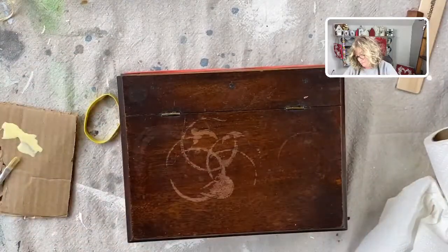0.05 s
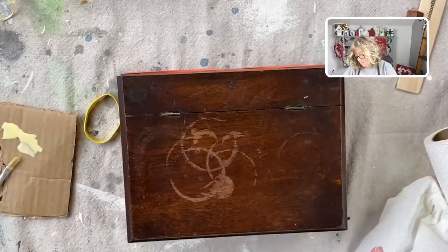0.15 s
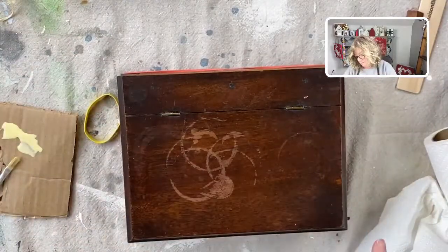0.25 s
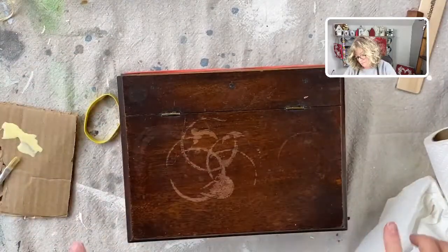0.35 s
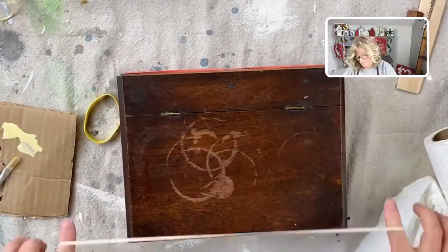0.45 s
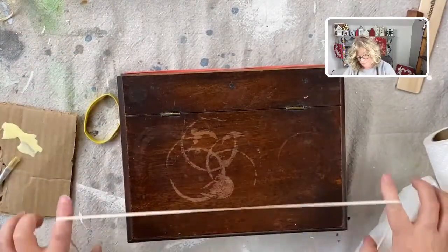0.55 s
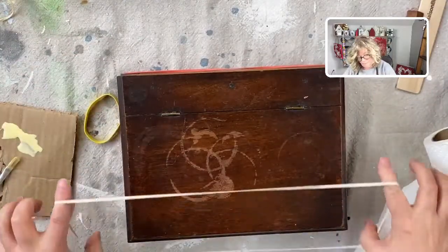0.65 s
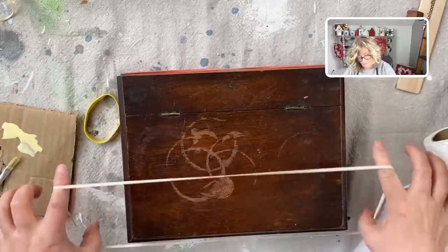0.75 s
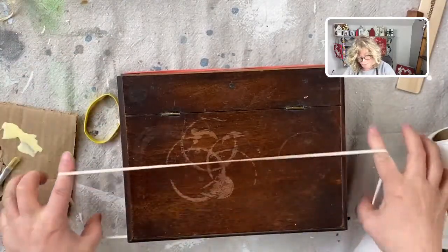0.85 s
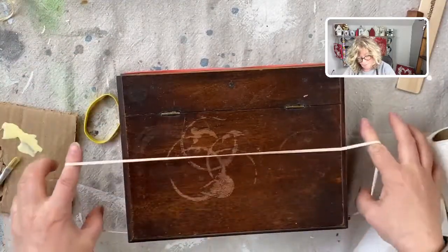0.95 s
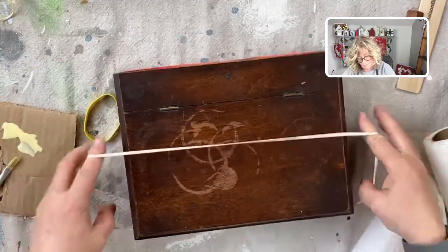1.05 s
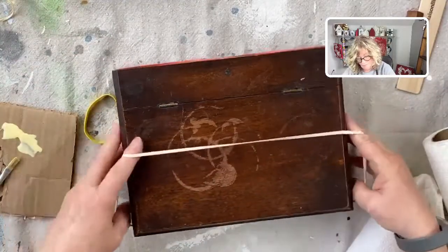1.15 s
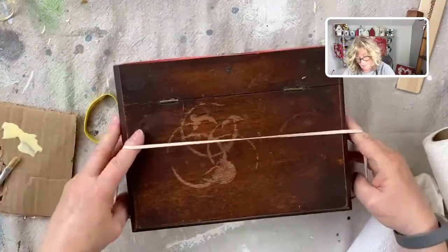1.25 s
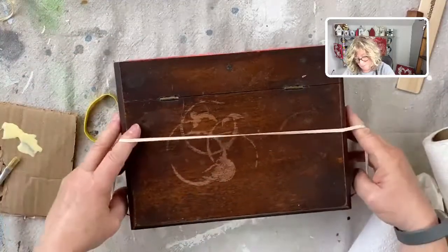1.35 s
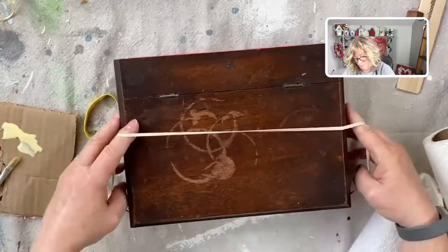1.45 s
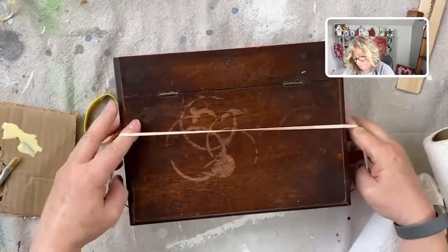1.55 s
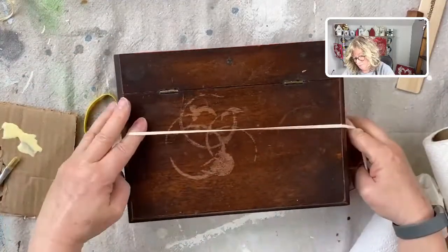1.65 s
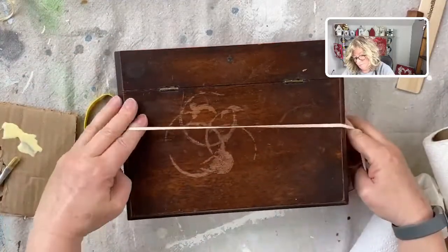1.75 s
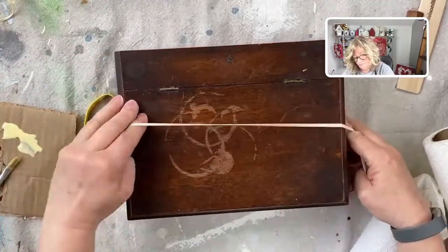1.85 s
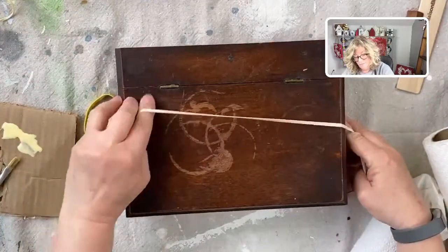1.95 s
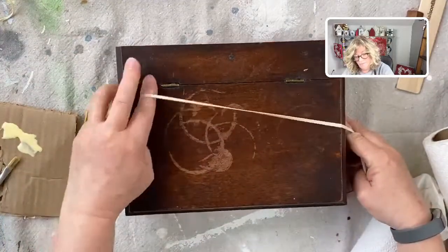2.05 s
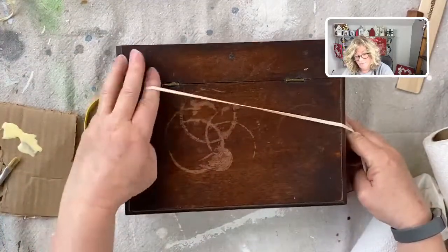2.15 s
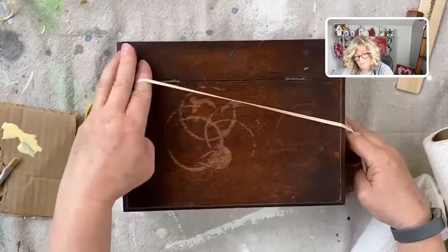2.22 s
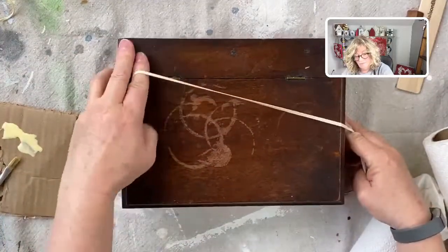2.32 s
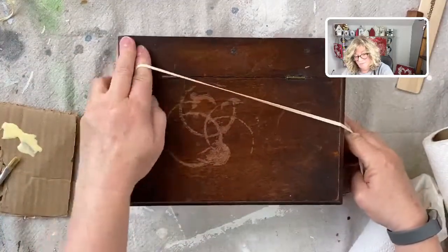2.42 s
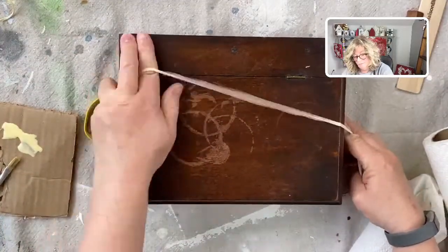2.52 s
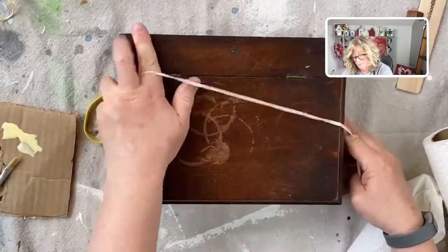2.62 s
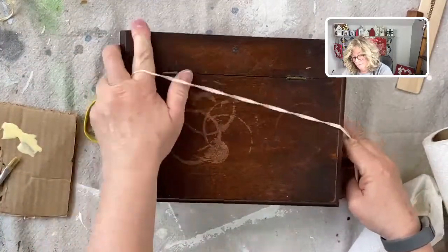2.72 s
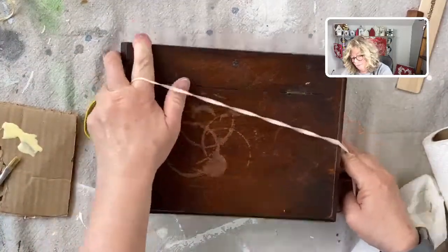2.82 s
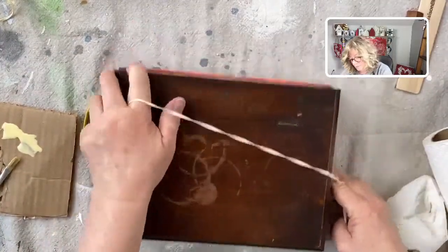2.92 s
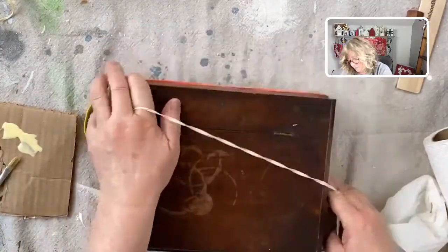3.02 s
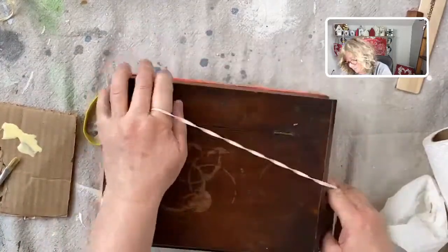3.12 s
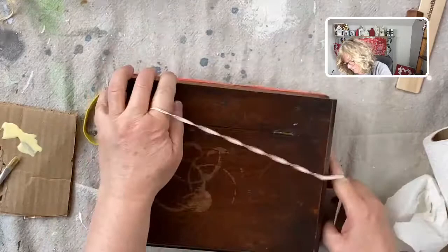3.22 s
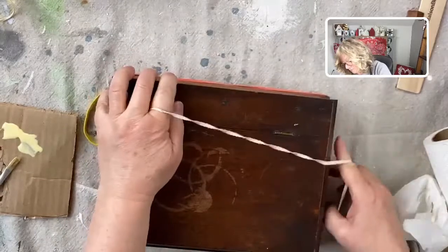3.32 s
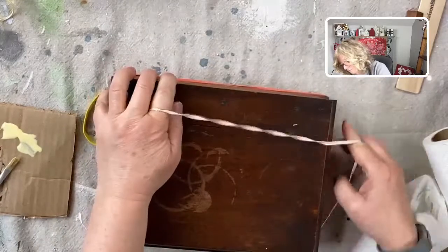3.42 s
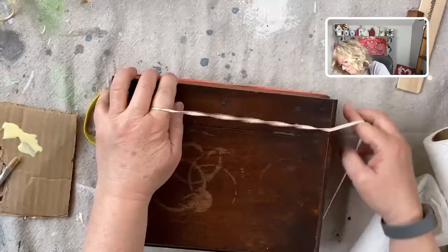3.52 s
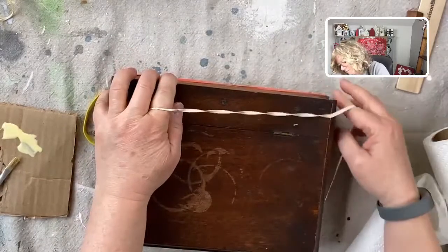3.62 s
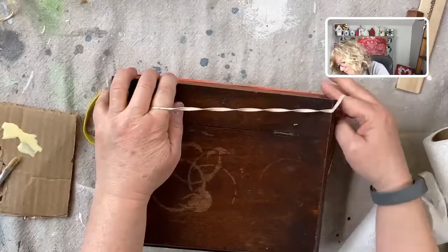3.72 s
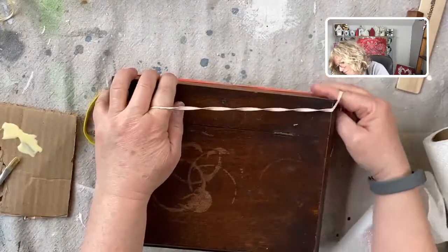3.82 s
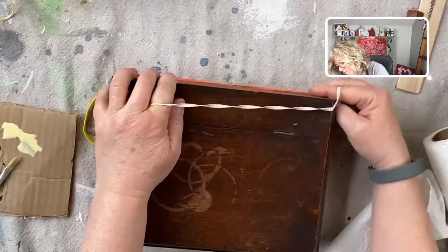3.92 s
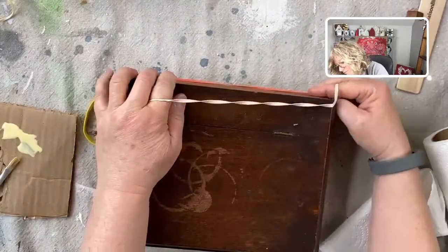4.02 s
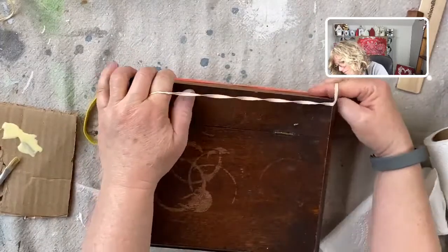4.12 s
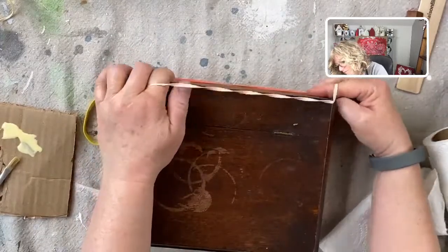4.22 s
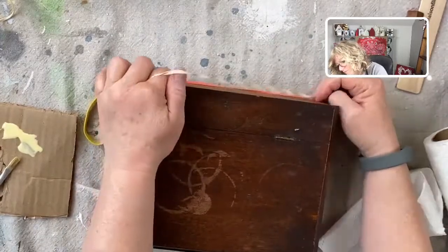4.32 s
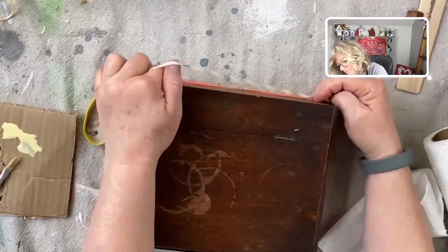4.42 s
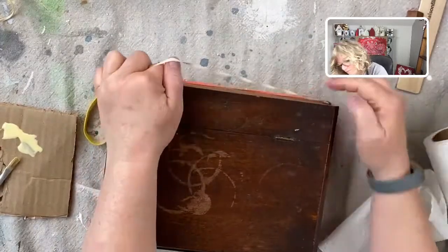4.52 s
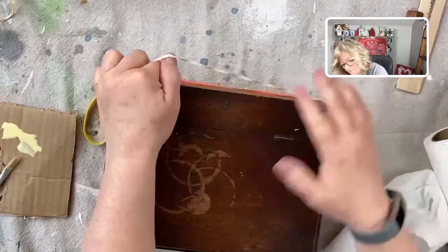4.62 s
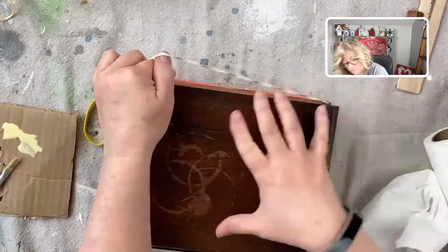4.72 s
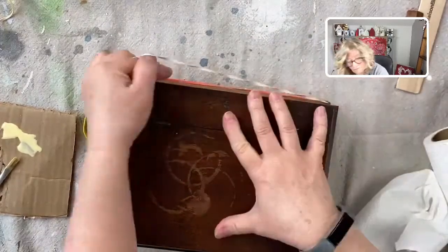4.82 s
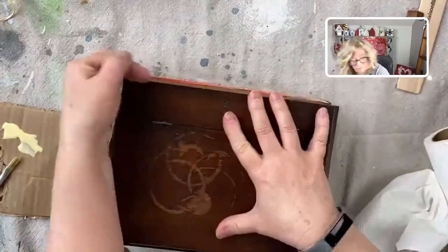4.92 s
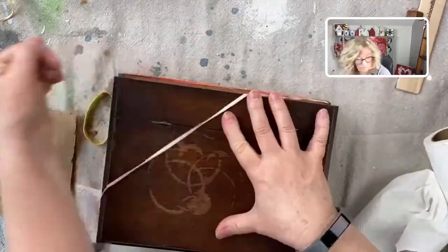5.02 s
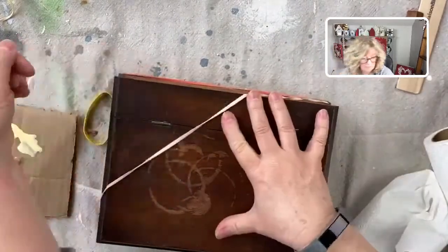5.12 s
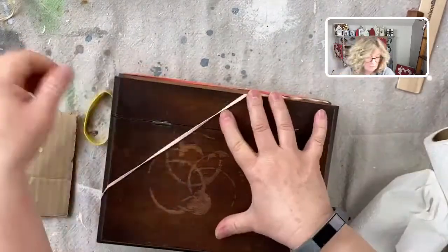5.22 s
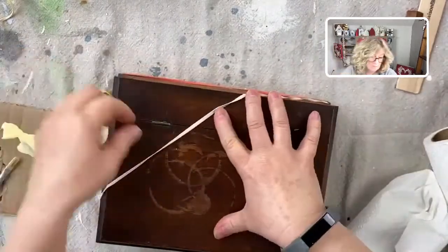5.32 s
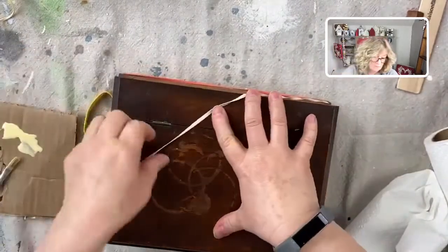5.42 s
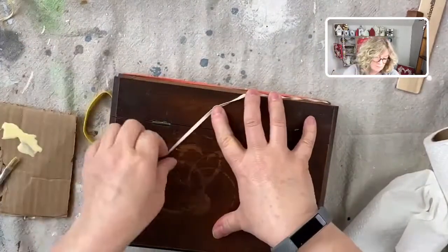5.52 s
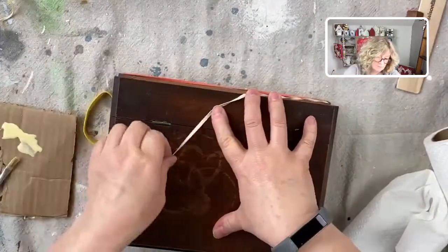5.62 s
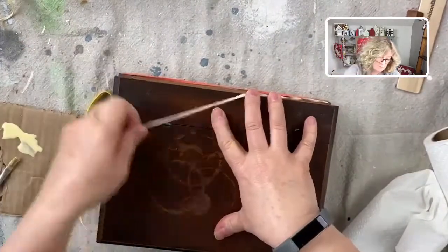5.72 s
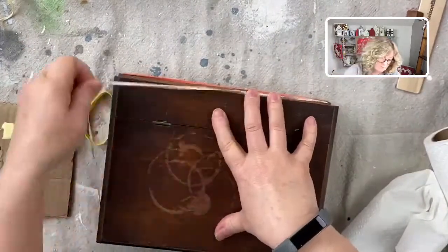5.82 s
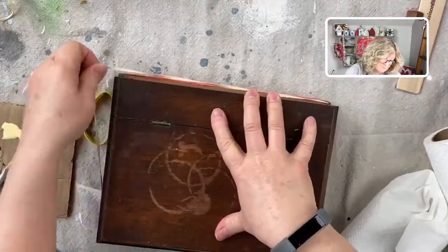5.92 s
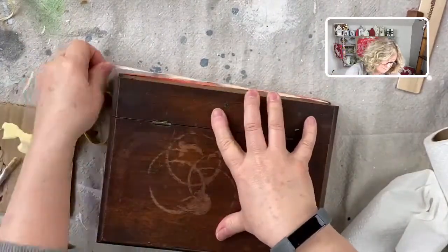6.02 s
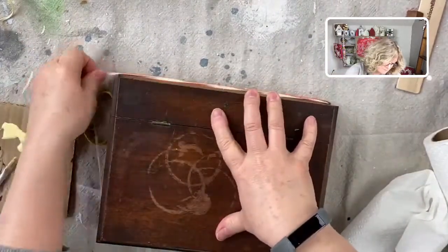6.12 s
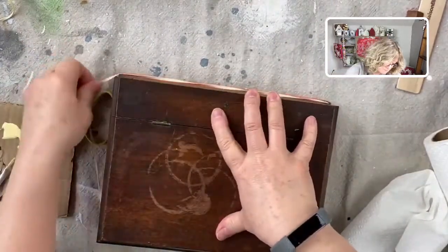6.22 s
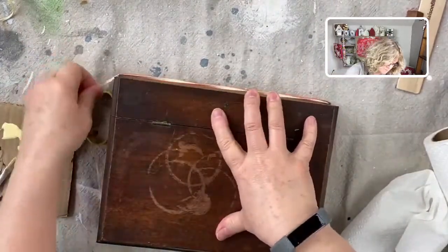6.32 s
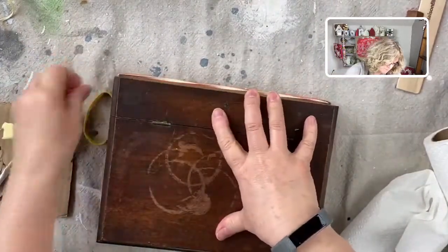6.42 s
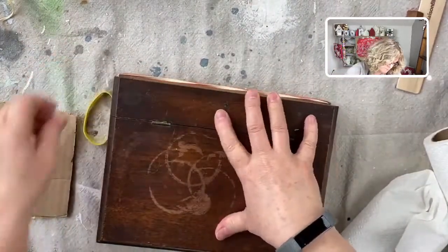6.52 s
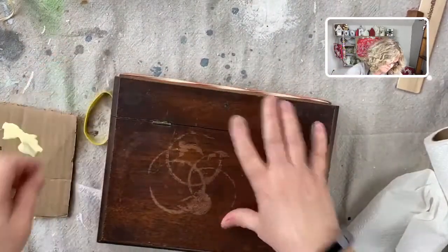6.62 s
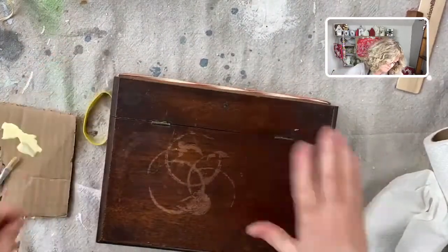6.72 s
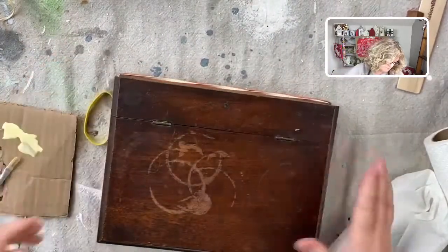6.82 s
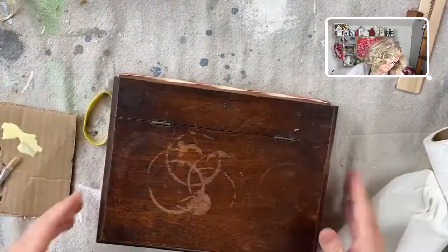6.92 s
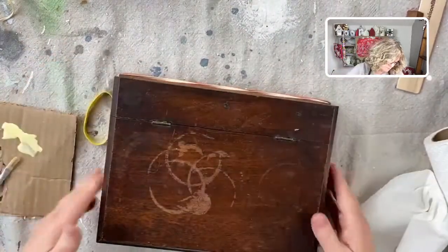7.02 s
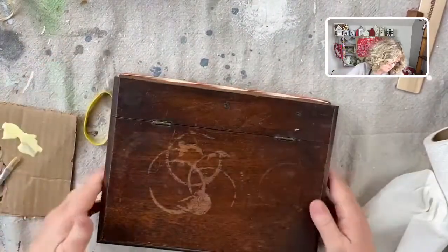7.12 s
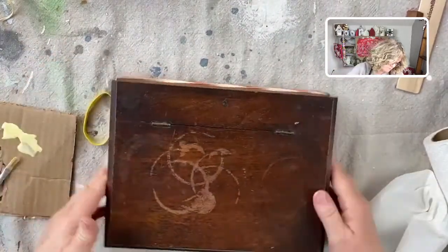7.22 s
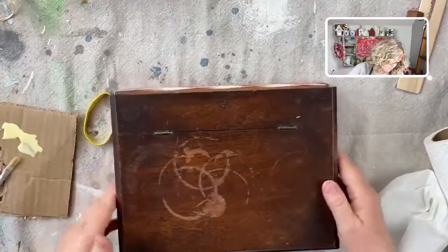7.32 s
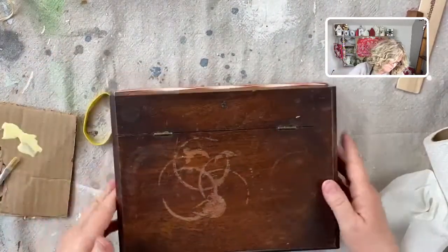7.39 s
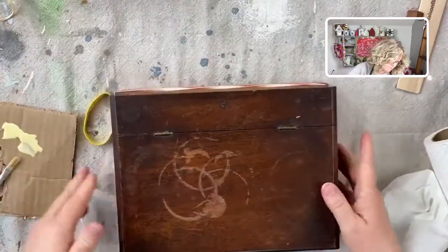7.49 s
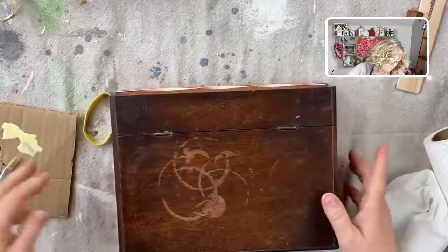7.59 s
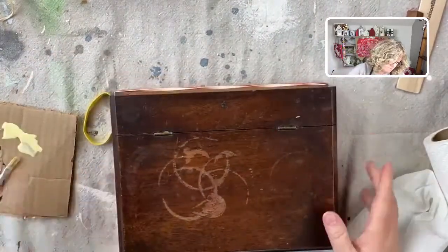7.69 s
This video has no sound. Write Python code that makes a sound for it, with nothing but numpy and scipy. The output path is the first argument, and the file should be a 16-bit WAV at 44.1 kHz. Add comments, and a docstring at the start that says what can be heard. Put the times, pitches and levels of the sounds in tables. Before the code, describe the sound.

A long rubber band is worked around a small wooden box, heard from above a cloth-covered table in a quiet, fairly live room. A tiny tick leads to a sharp snap on the wood at about 0.3 seconds. Dull bumps and soft sliding follow from 1 to 1.7 seconds. Between 2 and 2.8 seconds the rubber creaks, squeaks and slips in several small snaps with low twangs and knocks. The box scuffs over the cloth around 3 seconds, and light ticks come at 3.6 and 4. A strong snap with a low twang lands at 4.4 seconds, then a bump, and the loudest, a double crack, just after 5. Smaller slips and a squeak cluster near 5.9 seconds, before another loud snap at 6.5. From 7 seconds hands softly rub and shift the box, ending with a bump around 7.6.

```python
"""A long rubber band, stretched round a small wooden box, creeps, slips, twangs and snaps on the wood.
Snaps and slips ring the panels, stick-slip creaks and squeals, and the freed span swings at a low pitch.
Hands bump the box, rub its lid and shove it over a cloth-covered worktable.
The room is quiet and fairly live."""
import sys
import numpy as np
from scipy import signal
from scipy.fft import rfft, irfft, next_fast_len
from scipy.io import wavfile
from scipy.ndimage import uniform_filter1d, map_coordinates

SR = 44100
rng = np.random.default_rng(int(sys.argv[2]) if len(sys.argv) > 2 else 0)


def digitize_waveform(pressure):
    """Quantize a signal to 16-bit integers and store it at the path in sys.argv[1].

    Rows of a 2-D input are taken as channels; values are limited to [-1, 1].
    """
    field = np.atleast_2d(pressure).T
    bounded = np.clip(field, -1, 1)
    quanta = np.round(bounded * 32767).astype(np.int16)
    wavfile.write(sys.argv[1], SR, quanta)


N = 341775
AGE_S = np.arange(SR // 2) / SR  # time since a contact

# Panel modes of the box. Each row: frequency in Hz, width in Hz, gain in dB.
PANELS = [(264, 20, -4), (579, 18, -5.5), (683.4, 45, -5.5), (808.5, 14, 1), (1082, 11, -3),
          (1325, 18, 2.5), (1290, 69, -4.5), (1888, 10, 4.5), (2900, 80, -6.5), (3200, 38, -17.5),
          (4800, 60, -13), (5450, 60, 6)]
# Friction spectrum of rubber on wood. Each row: frequency in Hz, gain in dB.
GRIT = [(300, -19), (700, -0.5), (1800, -2), (3500, -8.5), (7000, -13), (15000, -20.5)]
# Box shoved over the cloth. Each row: start in seconds, length in seconds, grumble and hiss gains in dB.
SHOVES = [(1.023, 0.27, -57, -71.5), (1.29, 0.12, -65.5, -80), (1.567, 0.16, -55.5, -81),
          (2.506, .13, -54.5, -80), (2.802, 0.062, -55.5, -73), (2.868, .14, -48.5, -60),
          (3.008, 0.09, -49, -57), (3.128, 0.13, -62, -68.5), (3.592, 0.11, -60.5, -73),
          (4.893, 0.13, -62.5, -70), (5.586, 0.12, -65.5, -74.5), (7.184, .06, -62.5, -78.5),
          (7.278, 0.095, -64, -68), (7.348, 0.093, -57.5, -61.5)]
# Skin and rubber on the lid. Each row: start in seconds, length in seconds, rub and hiss gains in dB.
RUBS = [(0.605, 0.028, -69.5, -83), (0.723, 0.16, -67.5, -67.5), (1.007, 0.021, -62, -81),
        (1.194, 0.031, -58, -66), (1.76, 0.12, -72, -76), (2.076, 0.031, -53.5, -73),
        (2.145, 0.056, -53, -64), (2.25, 0.091, -69, -78), (2.363, 0.378, -61.5, -63.5),
        (2.52, 0.024, -57, -78), (3.316, 0.27, -71, -71.5), (3.68, 0.49, -71.5, -79),
        (4.04, 0.21, -73, -71), (4.614, 0.16, -74, -81), (4.957, 0.068, -83, -69), (5.302, 0.24, -74, -75),
        (5.828, 0.17, -63, -74), (7.025, 0.097, -64.5, -75.5), (7.1, .08, -61.5, -72)]


def band_snaps(flutter_db=-6, ring_db=4, edge_db=3, slide_db=-27, slide_s=0.0073):
    """Rubber slides, lets go with a crack and flutters on the wood; the landing spot colours the slap."""
    # Each row: start in seconds, level in dB, thud, wood and sizzle in dB re 3 kHz,
    # wood frequency in Hz, edge ring in Hz, crack t60 in seconds.
    snaps = [(0.2629, -37.5, -12, -3, -7.5, 644, 2600, 0.012),
             (0.2711, -33, -5.5, 15.5, 1, 660, 2130, 0.042), (2.011, -46, 19.5, 11.5, 1, 805, 3050, 0.051),
             (2.3508, -50, -5, 16, -5, 790, 3200, 0.072), (2.4561, -42.5, 3, 7.5, 4, 900, 6600, 0.03),
             (2.6145, -43, 8, 10.5, -1, 980, 2900, 0.027), (2.767, -39.5, 22, 6, -4, 1000, 4030, 0.025),
             (4.3644, -38, 4, 13, 0, 1560, 2290, .03), (4.3754, -30.5, 16.5, 12.5, 7, 1470, 1450, 0.047),
             (5.0407, -25, 2.5, 5.5, 4, 1340, 5580, 0.028),
             (5.0771, -20.5, 8.5, 15.5, 6.5, 750, 3030, 0.01),
             (5.851, -43.5, 16.5, 17, -19, 900, 2234, .09), (5.9091, -45.5, 12, 6, 2.5, 890, 1990, 0.017),
             (5.927, -41, 18, 7, 7.5, 905, 1950, 0.036), (5.960, -45.5, 11, 1, 8.5, 900, 3060, 0.0076),
             (6.4808, -25.5, 2, 11, 4.5, 963, 1890, 0.016)]
    # Spectrum common to all slaps. Each row: frequency in Hz, gain in dB.
    slap_spectrum = [(50, -21), (100, -6.5), (170, 1.5), (260, 6), (440, 3.5), (700, 0.5), (2800, 3.5),
                     (4200, 1.5), (7500, -2), (10000, -0.5), (13500, 3.5), (16000, -1)]
    out = np.zeros(N)
    for start_s, db, thud_db, wood_db, sizzle_db, wood_hz, edge_hz, t60_s in snaps:
        crack = burst(fade(t60_s) * (1 - fade(0.0011)) * contact_noise())
        flutter = burst(fade(1.7 * t60_s) * (1 - fade(0.026)) * rng.laplace(size=len(AGE_S)))
        force = whiten(crack + amp(flutter_db) * flutter)
        edge = resonate(force, [(edge_hz, 0.062 * edge_hz, edge_db)])
        box = force + amp(ring_db) * resonate(force, PANELS) + edge
        landing = [(260, thud_db), (440, (thud_db + wood_db) / 2 - 5), (wood_hz, wood_db - 2),
                   (2200, 0), (3800, 0), (11000, sizzle_db)]
        slap = minimum_phase(box, lambda hz: amp(along(slap_spectrum, hz) + along(landing, hz)))
        add(out, start_s, amp(db) * in_room(burst(slap), wet_db=-5))
        # the slide gathers speed in the 50 ms before release
        slide = np.exp(-AGE_S / slide_s)[::-1] * coloured(contact_noise(), GRIT)
        add(out, start_s - 0.05, amp(db + slide_db) * slide[-SR // 20:])
    return out


def band_ticks(gain_db=-14, crack_db=-3, overtone_db=-8, blur_rad=0.37):
    """A short slip over an edge clicks and rings one small spot of the wood."""
    # Each row: start in seconds, relative level in dB, pitch in Hz, click in dB re the ring.
    ticks = [(0.1258, -46.5, 1800, -6), (1.606, -47.5, 1220, -9), (2.532, -48, 1240, -12),
             (2.7313, -62, 3380, 11), (3.5884, -43, 1730, -7.5), (4.0004, -34.5, 1714, -38),
             (4.617, -42, 1850, -9), (4.892, -59.5, 1380, 4.5), (4.934, -52.5, 1870, -15),
             (7.033, -53.5, 2664, -14)]
    out = np.zeros(N)
    for start_s, db, hz, click_db in ticks:
        crack = bandpass(whiten(fade(0.031) * contact_noise()), 1200, 2300, order=2)
        click = bandpass(fade(0.024) * contact_noise(), 3000, 15000, order=1)
        phase = 2 * np.pi * hz * AGE_S + blur_rad * wobble(410)
        ring = fade(0.029) * (np.sin(phase) + amp(overtone_db) * np.sin(1.98 * phase))
        tick = burst(ring) + amp(crack_db) * burst(crack) + amp(click_db) * burst(click)
        add(out, start_s, amp(db + gain_db) * in_room(tick, wet_db=-6.5, echo_db=-16))
    return out


def band_twangs(slope_db_per_octave=-1, even_db=-9, sharp=0.023, waver=0.013):
    """Plucked near its middle, the freed span favours odd harmonics; it starts a little sharp."""
    # Each row: start in seconds, fundamental level in dB, pitch in Hz, t60 in seconds.
    twangs = [(2.384, -44, 83.4, 0.27), (2.617, -45.5, 87.8, 0.17), (2.773, -45, 81.4, 0.27),
              (2.78, -42.5, 132.7, 0.23), (4.368, -41.5, 90, 0.16), (4.374, -48, 126.9, 0.76),
              (5.079, -52.5, 105.1, 0.2), (5.851, -55, 86.6, 0.21)]
    out = np.zeros(N)
    for start_s, db, hz, t60_s in twangs:
        phase = phase_of(hz * (1 + sharp * fade(0.094) + waver * wobble(70)))
        tone = np.zeros(len(AGE_S))
        for k in range(1, 7):
            gain = amp(slope_db_per_octave * np.log2(k) + even_db * (k % 2 == 0))
            tone += gain * fade(t60_s / k ** 0.33) * np.sin(k * phase + rng.uniform(0, 2 * np.pi))
        add(out, start_s, amp(db) * tone * (1 - fade(0.0077)))
    return out


def band_squeaks(spread=0.035, wander_hz=100, rise_s=0.005):
    """Taut rubber sticks and slips on the varnish: a narrow, wavering tone with gritty catches."""
    # Each row: start in seconds, length in seconds, level in dB, pitch in Hz, grit in dB re the tone.
    squeaks = [(0.125, 0.029, -62.5, 2930, 0), (1.98, 0.075, -56, 780, -6.5),
               (2.216, 0.091, -60, 2347, -13), (2.44, 0.034, -54, 797, 5.5),
               (2.532, 0.025, -44.5, 760, -10), (2.582, 0.016, -50, 905, 4), (2.755, 0.033, -54, 982, -0.5),
               (3.982, 0.012, -48, 468, -10), (4.335, 0.047, -56.5, 300, -7), (5.035, 0.016, -58, 5800, 3),
               (5.862, .08, -56.5, 825, -8), (5.993, .02, -59.5, 2920, 5)]
    out = np.zeros(N)
    for start_s, length_s, db, hz, grit_db in squeaks:
        slip_hz = hz + np.hypot(spread * hz, wander_hz) * wobble(454)
        tone = unit(np.sin(phase_of(slip_hz)) * amp(1.2 * wobble(138)))
        grit = coloured(contact_noise() * amp(4 * wobble(700)), GRIT)
        envelope = (1 - np.exp(-AGE_S / rise_s)) * np.cos(np.pi / 2 * np.minimum(AGE_S / length_s, 1))
        add(out, start_s, amp(db) * (tone + amp(grit_db) * grit) * envelope)
    return in_room(out, wet_db=-10)


def band_creaks(slip_hz=330, unevenness=0.59, size_spread_db=5, click_db=-19):
    """Stretched rubber creeps round a corner in tiny uneven slips; each one rings the wood."""
    # Each row: start in seconds, length in seconds, gain in dB.
    creaks = [(1.595, 0.0083, -58.5), (1.67, 0.083, -72.5), (2.02, 0.077, -63), (2.175, 0.014, -56),
              (2.376, 0.025, -59.5), (2.53, .08, -73), (2.75, 0.017, -53.5)]
    # Each row: frequency in Hz, width in Hz, gain in dB.
    corner_modes = [(3340, 35, -3), (3875, 52, -0.5), (4680, 27, -7), (6570, 87, -9.5), (8400, 32, -25),
                    (8700, 150, -12)]
    rate_hz = slip_hz * np.exp(unevenness * wobble(300, N))
    slips = np.diff(np.floor(np.cumsum(rate_hz) / SR), prepend=0)
    slips *= amp(size_spread_db * np.tanh(wobble(500, N)))
    creak = resonate(slips, corner_modes) + amp(click_db) * bandpass(slips, 1500, 10500, order=1)
    return in_room(strokes(creaks) * unit(creak), wet_db=-20, echo_db=-18)


def box_bumps(thump_db=-4, push_db=2, panel_db=-3, knock_t60_s=0.1):
    """A hand's push rocks the box once or twice and knocks the panels."""
    # Each row: start in seconds, relative level in dB, push frequency in Hz, knock gain in dB.
    bumps = [(1.039, -35.5, 171, -14), (1.258, -32, 243, -22), (1.47, -47.5, 269, -0.5),
             (1.603, -45, 230, -7), (1.711, -45.5, 149, -11), (2.009, -44.5, 149, -12),
             (2.069, -45, 263, -5.5), (2.146, -50.5, 240, -8), (2.195, -53, 202, -7),
             (2.380, -36.5, 204, -33), (2.769, -30, 149, -10.5), (3.211, -43.5, 290, -12.5),
             (3.263, -50, 231, -17), (3.585, -39.5, 213, -14), (4.118, -55, 238, -18),
             (4.889, -33.5, 212, -18.5), (4.902, -38.5, 130, -25), (5.586, -52.5, 264, -11),
             (7.181, -48, 144, -29), (7.609, -37, 227, -23.5)]
    # The whole box on the padded table. Each row: frequency in Hz, width in Hz, gain in dB.
    body_modes = [(84, 31, -3), (130, 11, 4.5), (222.7, 13, -4), (263, 12, 4), (345, 120, -6.5)]
    out = np.zeros(N)
    for start_s, db, hz, knock_db in bumps:
        pulse_time = np.pi * hz * AGE_S / 2 - 2
        push = np.sin(4 * pulse_time) * np.exp(-pulse_time ** 2)
        thump = burst(resonate(push, body_modes)) + amp(push_db) * burst(push)
        knock = bandpass(whiten(fade(knock_t60_s) * contact_noise()), 190, 920, order=3)
        bump = amp(thump_db) * burst(thump) + amp(knock_db + panel_db) * burst(knock)
        add(out, start_s, amp(db) * in_room(bump, wet_db=-9.5, echo_db=-20))
    return out


def box_drag(drag, pressure_db, groan_hz=227.5, groan_spread=0.06, groan_from_db=-48.5):
    """The box grumbles on the cloth; on a hard shove its chatter takes over as a groan."""
    # Each row: frequency in Hz, gain in dB.
    grumble_spectrum = [(30, -29), (60, -6.5), (95, -5), (160, -11), (235, -1), (340, -6.5), (480, -16.5),
                        (800, -41)]
    chatter_hz = groan_hz * (1 + groan_spread * wobble(90, N))
    chatter = unit(np.sin(phase_of(chatter_hz)) * amp(pressure_db))
    grumble = coloured(catches(pressure_db), grumble_spectrum)
    return drag * (grumble + drag / amp(groan_from_db) * chatter)


def lid_rubs(drag, pressure_db, scrape_db=-7.5, grain_db=5, ring_db=2):
    """Skin and rubber catch on the lid and ring the panels; shoves scrape the wood too."""
    # Each row: frequency in Hz, gain in dB.
    rub_spectrum = [(250, -8.5), (500, 4), (900, 4), (1700, 4), (3000, -2), (5000, -11), (9000, -46)]
    envelope = np.hypot(strokes([row[:3] for row in RUBS]), amp(scrape_db) * drag)
    friction = catches(pressure_db) * amp(grain_db * np.tanh(wobble(250, N)))
    lid = friction + amp(ring_db) * resonate(friction, PANELS)
    return envelope * coloured(in_room(lid, wet_db=-2.5), rub_spectrum)


def sliding_hiss(pressure_db, gain_db=-1):
    """Fine catches on the weave and the lid hiss with every shove and rub."""
    # Each row: frequency in Hz, gain in dB.
    hiss_spectrum = [(2000, -16.5), (4500, -4.5), (8000, -8), (13000, -6.5), (16000, -6.5)]
    envelope = strokes([(start_s, length_s, db) for start_s, length_s, _, db in SHOVES + RUBS])
    return amp(gain_db) * envelope * coloured(in_room(catches(pressure_db), wet_db=3.5), hiss_spectrum)


def room_tone(level_db=-70.5):
    """Faint steady rumble and hiss."""
    # Each row: frequency in Hz, gain in dB.
    room_spectrum = [(20, -31.5), (40, -5.5), (80, 4.5), (130, 1.5), (290, -1), (450, -10.5), (1300, -16),
                     (3000, -19), (7000, -24), (9000, -23), (14000, -25.5), (16000, -34)]
    return amp(level_db) * coloured(rng.standard_normal(N), room_spectrum)


def in_room(x, wet_db, echo_db=-8, echo_s=0.0087):
    """Direct sound, one near reflection and a diffuse tail whose top treble dies first."""
    # Each row: frequency in Hz, t60 in seconds.
    decay_times = [(100, 0.29), (300, 0.45), (1000, 0.45), (3500, 0.44), (7000, 0.37), (14000, 0.23)]
    hz, t, spectra = signal.stft(rng.standard_normal(SR * 2 // 3), SR, nperseg=256)
    decay = np.exp(-np.log(1000) * t / along(decay_times, hz)[:, None])
    tail = signal.istft(spectra * decay, SR, nperseg=256)[1]
    tail *= 1 - np.exp(-np.arange(len(tail)) / SR / 0.00023)
    response = amp(wet_db) * tail / np.linalg.norm(tail)
    response[0] += 1
    add(response, echo_s, amp(echo_db) * np.hanning(5) / 2)  # slightly dull reflection
    return signal.fftconvolve(x, response)[:N]


def catches(pressure_db, grain_db=3):
    """Sliding friction: dense tiny catches that follow the hand's pressure."""
    return rng.standard_normal(N) * amp(pressure_db + grain_db * wobble(900, N))


def strokes(rows, attack_s=0.012, release_s=0.038, swell_db=2):
    """Envelope of sliding strokes: quick start, slow swell, short release."""
    power = np.zeros(N)
    for start_s, length_s, db in rows:
        t = np.arange(int((length_s + 0.25) * SR)) / SR
        swell = amp(swell_db * (np.minimum(t / length_s, 1) - 1.5))
        gate = (1 - np.exp(-t / attack_s)) * np.exp(-np.maximum(t - length_s, 0) / release_s)
        add(power, start_s, (amp(db) * swell * gate) ** 2)
    return np.sqrt(power)


def amp(db):
    """Decibels to gain."""
    return 10 ** (np.asarray(db) / 20)


def unit(x):
    """Scale to rms 1."""
    return x / np.sqrt(np.mean(x ** 2) + 1e-20)


def burst(x):
    """Scale to the energy of 10 ms at rms 1."""
    return x / np.sqrt(np.sum(x ** 2) / (SR / 100) + 1e-20)


def along(points, hz):
    """Interpolate (Hz, value) points on a log axis."""
    point_hz, values = np.transpose(points)
    return np.interp(np.log(hz + 1), np.log(point_hz + 1), values)


def fade(t60_s):
    """Exponential decay after a contact."""
    return np.exp(-np.log(1000) * AGE_S / t60_s)


def contact_noise():
    """White noise for one contact."""
    return rng.standard_normal(len(AGE_S))


def wobble(rate_hz, size=SR // 2):
    """Smooth random curve with knots at rate_hz."""
    knots = rng.standard_normal(int(size * rate_hz / SR) + 4)
    return map_coordinates(knots, [np.arange(size) * rate_hz / SR])


def phase_of(hz):
    """Running phase in radians."""
    return 2 * np.pi * np.cumsum(hz) / SR


def add(track, start_s, sound):
    """Mix a sound into the track."""
    part = track[max(round(start_s * SR), 0):][:len(sound)]
    part += sound[:len(part)]


def filtered(x, response):
    """Apply a complex frequency response."""
    size = next_fast_len(len(x) + SR // 2)
    return irfft(rfft(x, size) * response(np.fft.rfftfreq(size, 1 / SR)), size)[:len(x)]


def bandpass(x, low_hz, high_hz, order):
    """Causal Butterworth band-pass."""
    return signal.sosfilt(signal.butter(order, [low_hz, high_hz], "band", fs=SR, output="sos"), x)


def resonate(x, modes):
    """Drive damped modes of alternating sign."""
    return filtered(x, lambda f: sum(
        (-1) ** k * amp(db) * 1j * f * width_hz / (hz * hz - f * f + 1j * f * width_hz)
        for k, (hz, width_hz, db) in enumerate(modes)))


def coloured(x, spectrum):
    """Shape by (Hz, dB) points, at rms 1."""
    return unit(filtered(x, lambda hz: amp(along(spectrum, hz))))


def minimum_phase(x, gain):
    """Apply a gain curve without pre-ringing."""
    size = 2 * len(x)
    cepstrum = irfft(np.log(gain(np.fft.rfftfreq(size, 1 / SR)) + 1e-6))
    cepstrum[1:len(x)] *= 2
    cepstrum[len(x) + 1:] = 0
    return irfft(rfft(x, size) * np.exp(rfft(cepstrum)))[:len(x)]


def whiten(x, smooth_bins=220):
    """Flatten a burst's spectrum so the contact has no pitch of its own."""
    power = np.abs(uniform_filter1d(np.abs(rfft(x, 2 * len(x))) ** 2, smooth_bins))
    return minimum_phase(x, lambda hz: 1 / np.sqrt(power / power.mean() + 1e-3))


def scene():
    """Band, hands and room in mono, heard from above the table."""
    band = band_snaps() + band_ticks() + band_twangs() + band_squeaks() + band_creaks()
    drag = strokes([row[:3] for row in SHOVES])
    pressure_db = 3 * np.tanh(wobble(45, N))  # hand judder
    sliding = box_drag(drag, pressure_db) + lid_rubs(drag, pressure_db) + sliding_hiss(pressure_db)
    return (band + box_bumps() + sliding + room_tone())[None]


def record(dry, low_hz=38, top_hz=16050):
    """Microphone bass roll-off and a steep upper band limit."""
    thin = signal.sosfilt(signal.butter(2, low_hz, "high", fs=SR, output="sos"), dry)
    return np.array([filtered(x, lambda hz: 1 / np.sqrt(1 + (hz / top_hz) ** 160)) for x in thin])


dry = scene()
out = record(dry)
digitize_waveform(out)
```